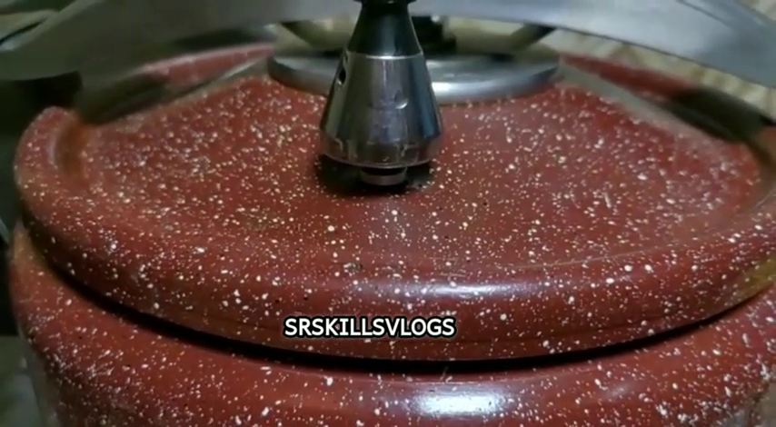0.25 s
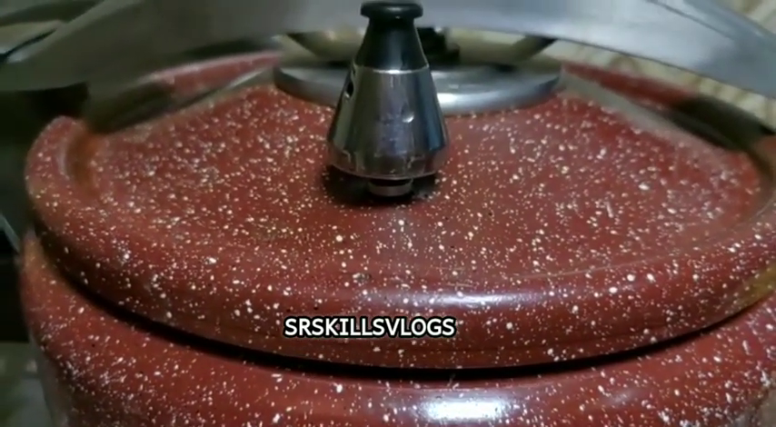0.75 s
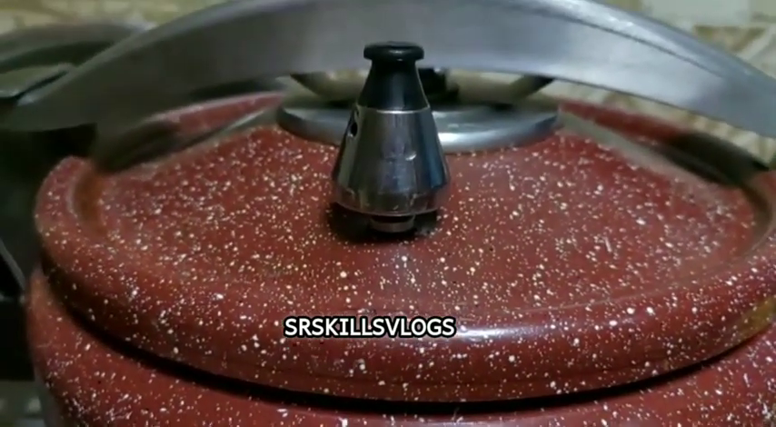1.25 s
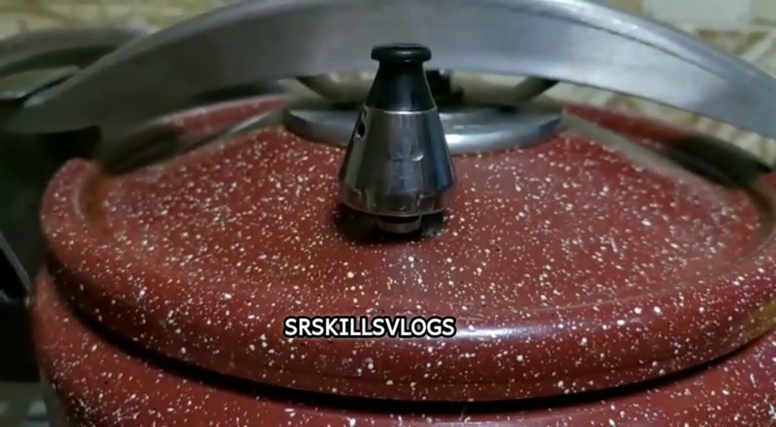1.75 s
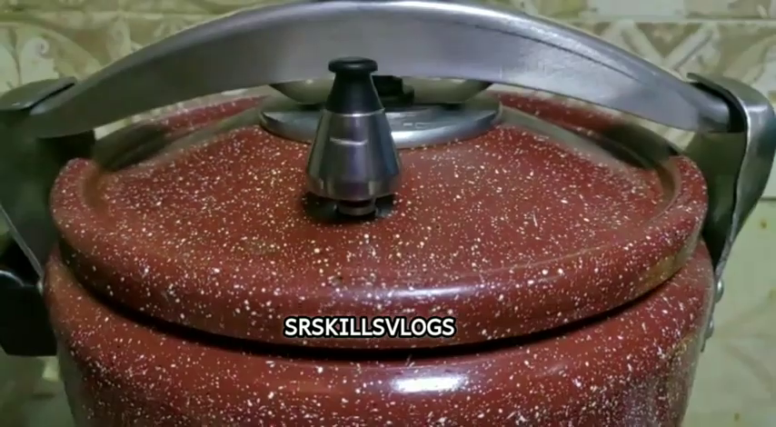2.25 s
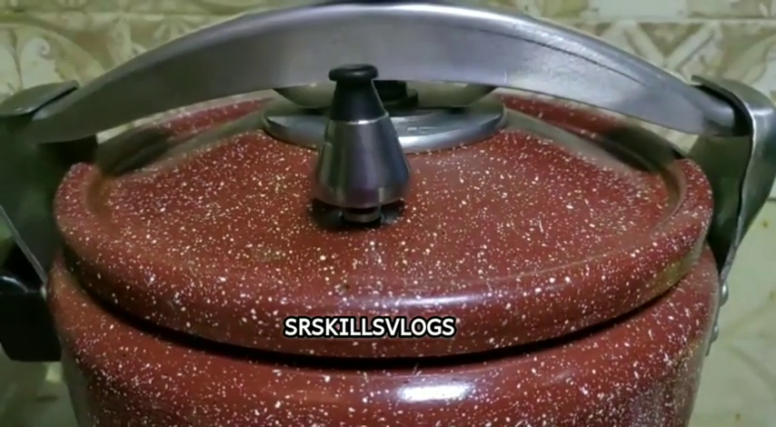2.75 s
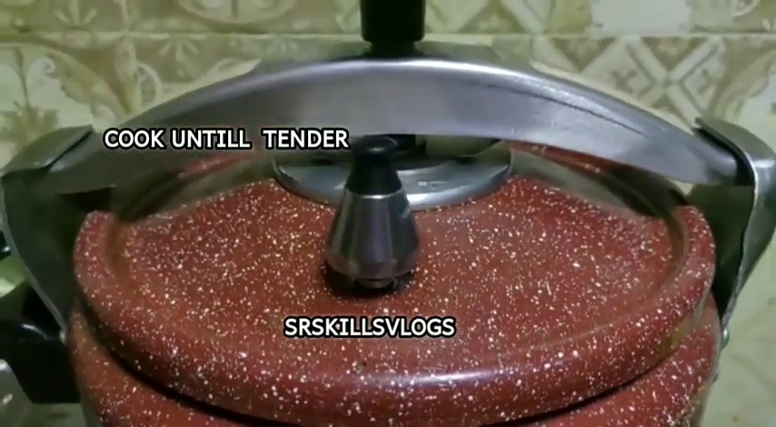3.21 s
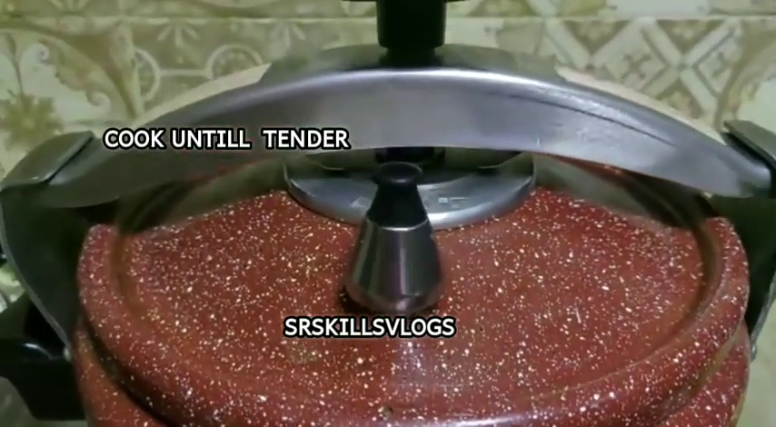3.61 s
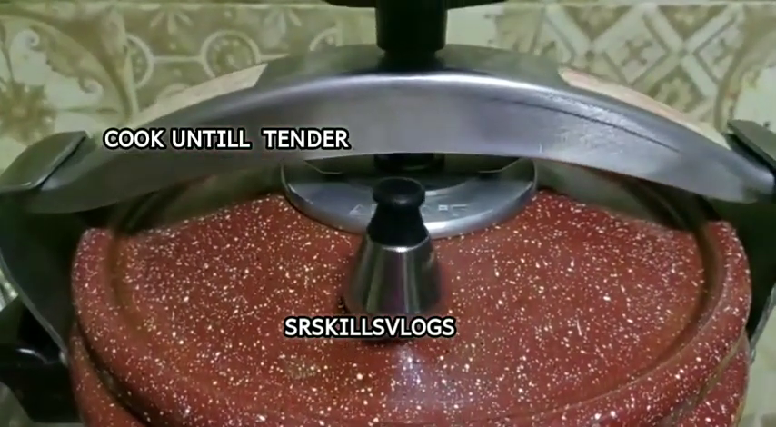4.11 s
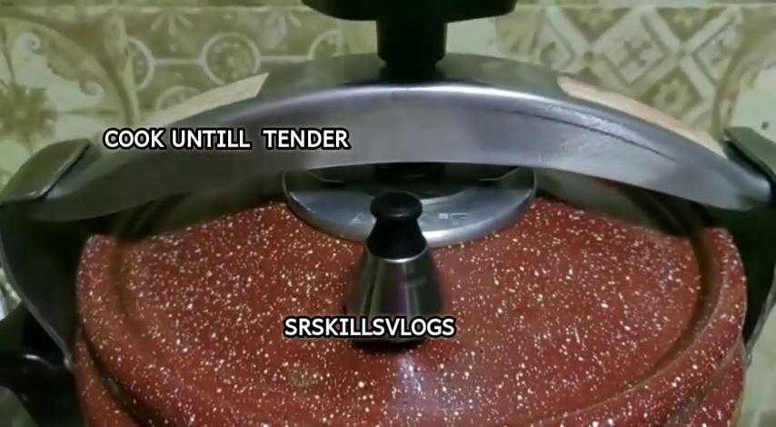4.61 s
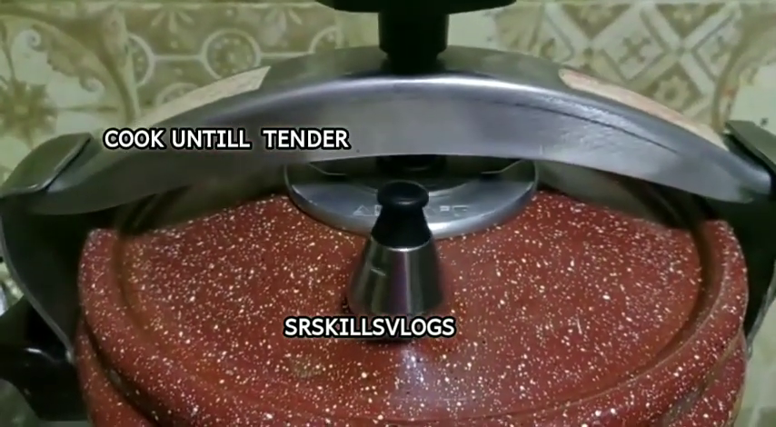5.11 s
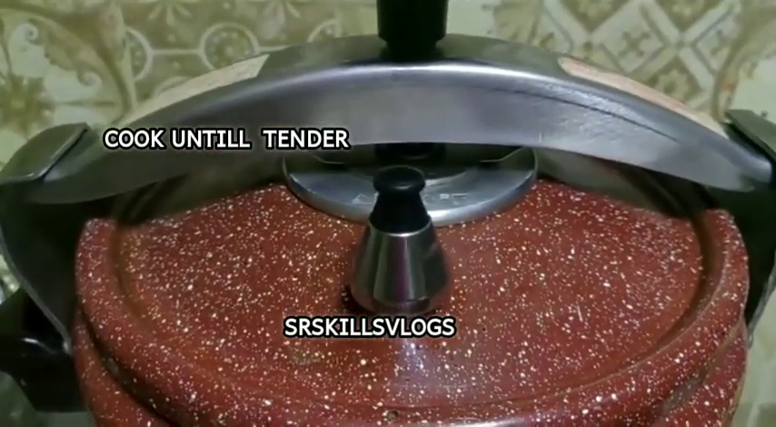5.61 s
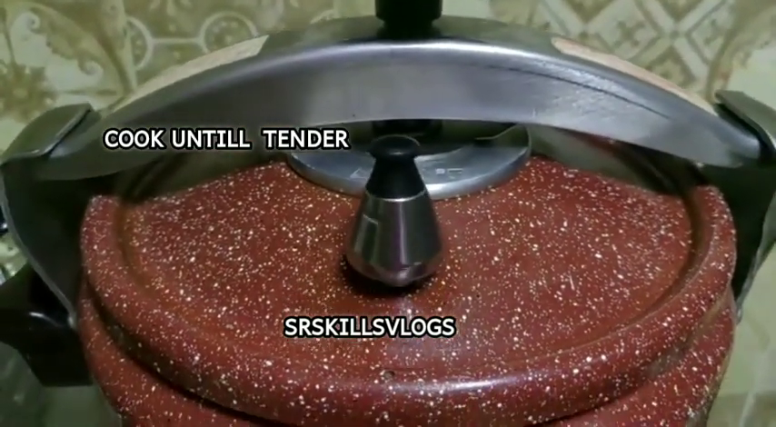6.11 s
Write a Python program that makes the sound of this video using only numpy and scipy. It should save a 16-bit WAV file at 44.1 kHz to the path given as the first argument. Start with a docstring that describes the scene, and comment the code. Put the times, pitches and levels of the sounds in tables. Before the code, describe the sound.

In a small tiled kitchen, a bird gives quick, bright, gliding chirps with short hard echoes over a faint room rush. Just after two seconds a pressure cooker valve starts hissing steadily, with one dull knock on the microphone. The bird calls on over the steam, then falls silent; the hiss flutters on, with coarse wet spits and faint distant hoots near the end.

```python
"""A small bird chirps and whistles close by: gliding tones, each answered by hard tiled walls.
A few faint hoots, wavering tones blurred by echo, then sound far off now and again over a faint room rush.
Steam hisses out from under a pressure cooker's weight valve: jet noise and gap resonances, rocked and surging.
Just after it starts, one dull knock bumps the microphone; water spits in coarse bursts, mostly near the end.
The bird falls silent before the end, while the hiss, the spitting and the hoots go on."""
import sys
import numpy as np
from scipy import signal
from scipy.fft import rfft, irfft, next_fast_len
from scipy.io import wavfile
from scipy.ndimage import uniform_filter1d, minimum_filter1d, map_coordinates

SR = 44100
rng = np.random.default_rng(int(sys.argv[2]) if len(sys.argv) > 2 else 0)


def master(y):
    """Save y as 16-bit WAV."""
    cut = np.clip(np.atleast_2d(y).T, -1, 1)
    pcm = np.round(cut * 32767)  # scale
    wavfile.write(sys.argv[1], SR, pcm.astype(np.int16))


N = 280476


def amp(db):
    """Decibels to gain."""
    return 10 ** (np.asarray(db) / 20)


def unit(x):
    """Scaled to rms 1."""
    return x / np.sqrt(np.mean(x ** 2) + 1e-20)


def colour(points):
    """EQ curve: gain over frequency from (f/Hz, level/dB) points on a log axis."""
    f, db = np.transpose(points)
    return lambda hz: amp(np.interp(np.log(hz + 1), np.log(f + 1), db))


def automation(rows):
    """Straight-line automation: one value per sample for each column after t/s."""
    s, *columns = np.transpose(rows)
    return [np.interp(np.arange(N) / SR, s, column) for column in columns]


def swells(rows):
    """A dB curve of smooth bumps from (middle t/s, length t/s, level/dB) rows."""
    t = np.arange(N) / SR
    return sum(db * np.cos(np.pi * np.clip((t - s) / length, -.5, .5)) ** 2 for s, length, db in rows)


def wobble(rate):
    """A smooth random curve, rate knots a second."""
    knots = rng.standard_normal(int(N * rate / SR) + 4)
    return map_coordinates(knots, [np.arange(N) * rate / SR])


def filtered(x, response):
    """x times a complex response of frequency."""
    m = next_fast_len(N + SR // 2)
    spectrum = rfft(x, m) * response(np.fft.rfftfreq(m, 1 / SR))
    return irfft(spectrum, m)[..., :N]


def add(track, s, x):
    """Mix x into the track from time s."""
    start = round(s * SR)
    track[start:start + len(x)] += x[:max(N - start, 0)]


def walls(x, early_db, early_t60, late_db, late_t60, reflections=900):
    """Direct sound, sparse quick wall reflections (so many a second) and a dense longer tail, at x's energy."""
    t = np.arange(SR // 2) / SR
    decay = amp(-60 * t / np.array([[early_t60], [late_t60]]))
    early, late = rng.standard_normal((2, len(t))) * (t > .003) * decay
    early = early * (rng.random(len(t)) < reflections / SR)
    echo = amp(early_db) * early / np.linalg.norm(early) + amp(late_db) * late / np.linalg.norm(late)
    wet = signal.fftconvolve(x, echo + (t == 0))
    return wet * np.linalg.norm(x) / np.linalg.norm(wet)


# the room's level: t/s, level/dB
ROOM_LEVEL = [(0, -58.5), (.4, -54), (2.18, -48), (2.23, -54.5), (3.4, -59), (4.6, -55), (5.4, -59),
              (6.36, -82)]
# the room's noise colour: f/Hz, relative level/dB (per Hz)
ROOM_COLOUR = [(25, 3.5), (60, -3.5), (100, -12), (200, -6.5), (370, -10), (500, -16), (950, -12.5),
               (2200, -19), (2650, -18), (3500, -25.5), (5200, -27), (7400, -26), (8300, -15.5),
               (9300, -52)]


def kitchen():
    """The faint rush of the kitchen: coloured noise whose level rises, drops and finally sinks."""
    room_db, = automation(ROOM_LEVEL)
    rush = unit(filtered(rng.standard_normal(N), colour(ROOM_COLOUR)))
    return amp(room_db + 0.91 * wobble(6)) * rush


# far hoots: start t/s, length t/s, first f/Hz, last f/Hz, level/dB
HOOTS = [(2.04, .13, 740, 765, -54), (2.36, .07, 755, 720, -40), (5.11, .1, 650, 615, -42),
         (5.52, .22, 955, 960, -42), (5.81, .16, 980, 915, -40), (6.09, .32, 600, 760, -37),
         (6.2, .18, 1150, 1160, -47)]


def hoots():
    """Soft, wavering tones that have come a long way, blurred by echo."""
    out = np.zeros(N)
    for s, length, first_hz, last_hz, db in HOOTS:
        size = int(length * SR)
        hz = np.linspace(first_hz, last_hz, size) * (1 + .02 * wobble(130)[:size])
        swell = amp(db) * np.sqrt(2) * signal.windows.tukey(size, .5)
        tone = swell * np.sin(2 * np.pi * np.cumsum(hz) / SR)
        add(out, s, walls(tone, early_db=-7, early_t60=.12, late_db=-10, late_t60=.3))
    return out


def knock(s=2.5711, thump_hz=76, thump_db=-10, t60=0.038, tap_db=-10, tap_time=0.00032, lean_db=2):
    """A bump on the microphone's body: a sharp push and a heavily damped low swing, louder at the left."""
    out, t = np.zeros(N), np.arange(SR // 8) / SR
    onset = 1 - np.exp(-t / tap_time)
    swing = amp(thump_db - 60 * t / t60) * np.cos(2 * np.pi * thump_hz * t + 1.2) * onset
    tap = amp(tap_db) * t / tap_time * np.exp(1 - t / tap_time)
    add(out, s, swing + tap)
    return out * amp([[lean_db], [-lean_db]])


def patches(x, patchy_db):
    """Patches of the noise some hundred Hz wide and tens of ms long swell and fade."""
    z = signal.stft(x, nperseg=512)[2]
    field = uniform_filter1d(rng.standard_normal(z.shape[1:]), size=4, axis=0)  # across frequency
    field = uniform_filter1d(field, size=9, axis=1)  # across time
    return signal.istft(z * amp(patchy_db * unit(field)), nperseg=512)[1][:, :N]


# share of the power that comes straight from the valve: f/Hz, share (0 to 1)
DIRECT_SHARE = [(500, 0.17), (2700, 0.67), (5500, 0.37), (7500, 0.18), (9000, 0.038)]
# the valve's pan: f/Hz, left minus right level/dB
SIDE_LEAN = [(500, 5), (2500, -3), (4500, 1.5), (7000, 1.5), (12000, -.6)]


def from_valve(response, lag_ms=0.14, patchy_db=3.0, alike=0.4):
    """Stereo noise of rms 1: the direct part reaches the left port first, the rest is diffuse."""
    share = lambda hz: np.clip(np.interp(hz, *np.transpose(DIRECT_SHARE)), 0, 1)
    sides = np.array([[.5], [-.5]])
    lead = lambda hz: np.exp(2j * np.pi * hz * lag_ms / 1000 * sides)
    direct = filtered(rng.standard_normal(N), lambda hz: np.sqrt(share(hz)) * lead(hz))
    common = np.clip(alike, 0, 1)
    diffuse = np.sqrt(common) * rng.standard_normal(N) + np.sqrt(1 - common) * rng.standard_normal((2, N))
    pair = direct + filtered(diffuse, lambda hz: np.sqrt(1 - share(hz)))
    return unit(filtered(patches(pair, patchy_db), lambda hz: response(hz) * colour(SIDE_LEAN)(hz) ** sides))


# wet spurts: t/s, level/dB, t60 t/s
SPURTS = [(2.449, -27, 0.18), (4.382, -34, 0.064), (5.571, -20.5, 0.17), (5.638, -23, 0.19),
          (5.763, -15.5, .2), (5.787, -25, 0.07), (5.936, -17.5, 0.22), (6.23, -23, 0.13)]
# the spurts' noise colour: f/Hz, relative level/dB (per Hz)
SPRAY_COLOUR = [(300, -51), (1500, -12), (2500, 9), (4500, 3), (8000, -1), (15000, -32)]


def spits(rise=0.0028, rough_db=1.5):
    """Drops of water blown through the gap burst into short, coarse spurts."""
    burst, t = np.zeros(N), np.arange(SR // 4) / SR
    for s, db, t60 in SPURTS:
        add(burst, s, amp(db - 60 * t / t60) * (1 - np.exp(-t / rise)))
    return burst * amp(rough_db * wobble(500)) * from_valve(colour(SPRAY_COLOUR))


STEAM_ON = 2.37  # s
PINCH_DB = 3  # typical dip of the jet at each rock of the weight
# steam pressure: t/s, level/dB
PRESSURE = [(2.39, -25.5), (2.7, -24.5), (3.6, -25.5), (4.4, -24.5), (5.2, -25.5), (5.9, -27.5),
            (6.36, -25.5)]
# rocking of the weight: t/s, f/Hz (rocks a second)
ROCKING = [(2.37, 14.2), (2.8, 14.24), (3.1, 10.95), (3.5, 12.8), (3.95, 18.8), (4.4, 13.6), (4.8, 14.12),
           (5.15, 13.53), (5.5, 9.5), (5.9, 10.86), (6.36, 6.5)]
# the weight lifts (+) or sinks onto its seat (-): middle t/s, length t/s, change of level/dB
SURGES = [(2.44, 0.12, 5), (2.59, 0.13, -4.5), (2.795, 0.12, 4.5), (4.385, 0.046, 5), (4.52, 0.098, -5),
          (4.645, 0.054, -4.5), (5.73, 0.066, -4.5), (6.2, 0.059, -3), (6.27, 0.039, -6)]


def flow():
    """Steam level (dB): a slowly varying pressure, surges, and a slightly uneven pinch at each rock."""
    pressure_db, = automation(PRESSURE)
    rate, = automation(ROCKING)
    steaming = np.arange(N) / SR > STEAM_ON
    turns = np.cumsum(rate * steaming) / SR + .06 * wobble(12)
    pinch = np.cos(np.pi * turns) ** 4 * (1 + .3 * wobble(10))
    return pressure_db + swells(SURGES) - PINCH_DB * pinch


# resonances of the gap under the weight: f/Hz, width f/Hz
GAP = [(5650, 730), (6850, 630), (8250, 790)]
# trim of each gap resonance, in the same order: level/dB
GAP_TRIM = [0, -6.5, -1]
# ride of the lowest resonance: t/s, level/dB
LOW_RING = [(2.4, -16), (3.05, -18), (3.3, -3), (4.2, 2.5), (6.36, -1.5)]
# a resonance flares up towards a whistle: middle t/s, length t/s, gain level/dB, resonance f/Hz
FLARES = [(2.69, 0.11, 12.5, 6850), (2.984, 0.25, 15.5, 6850), (3.327, 0.35, 12.5, 6850),
          (3.988, .2, 5.5, 5650), (4.82, 0.068, 9.5, 5650)]


def ringing():
    """Relative level (dB) of each gap resonance as it flares; the lowest one also builds up."""
    build_db, = automation(LOW_RING)
    levels = []
    for (centre, width), db in zip(GAP, GAP_TRIM):
        own_flares = [row[:3] for row in FLARES if abs(row[3] - centre) < width]
        levels.append(db + swells(own_flares))
    return [levels[0] + build_db] + levels[1:]


# the jet's noise colour: f/Hz, relative level/dB (per Hz)
JET_COLOUR = [(60, -21), (300, -20), (500, -15.5), (900, -9.5), (1500, -14.5), (2000, -8), (2700, 0.5),
              (3700, -2), (5000, -1.5), (8000, 1), (9700, -8.5), (11500, -3.5), (15000, -7.5)]


def steam(jet_db=2.5, gap_db=-4, flutter_db=1.18, sputter_db=0.98, opening=0.0085):
    """A turbulent jet and the resonances of its gap, all fluttering as the weight rocks on its seat."""
    flow_db = flow()
    opened = np.clip((np.arange(N) / SR - STEAM_ON) / opening, 0, 1)
    drift_db = .7 * wobble(22)
    hiss = amp(jet_db + drift_db) * from_valve(colour(JET_COLOUR))
    for (centre, width), edge_db in zip(GAP, ringing()):
        ring = from_valve(lambda hz: 1 / (1 + ((hz - centre) / width) ** 2) ** 2)
        hiss = hiss + amp(gap_db + edge_db + 1.03 * wobble(14)) * ring
    return opened * amp(flow_db + flutter_db * wobble(45) + sputter_db * wobble(190)) * hiss


def glide(length, attack, release, depth_db, pitches):
    """Pitch (Hz) and level (dB) of a note: one smooth bend under attack, hold and release."""
    t = np.arange(int(length * SR)) / SR
    bend = np.polyfit(np.linspace(0, 1, len(pitches)), pitches, len(pitches) - 1)
    fade = np.maximum(1 - t / attack, 0) ** 2 + np.maximum(1 - (length - t) / release, 0) ** 2
    return np.polyval(bend, t / length), -depth_db * fade


# kinds of note: length t/s, attack t/s, release t/s, depth of both fades level/dB,
# [pitch f/Hz at even steps through the note]
WHISTLE = (0.13, 0.062, 0.076, 37, [2550, 2560, 2530, 2540])
PIP = (.028, 0.014, 0.028, 26, [2470, 2530, 2860])
FLICK = (0.033, 0.0081, .02, 33, [3660, 2080, 1630])
TEW = (0.064, .033, .027, 45, [3420, 3240, 2654, 2420, 2460])
CHIP = (.041, 0.026, 0.0063, 23, [1210, 1798, 2504, 2236, 1340])
RISE = (0.067, 0.028, 0.032, 20, [2100, 3500, 3620])
FALL = (.075, 0.028, 0.031, 25, [3090, 2400, 1720])
SEEP = (.088, 0.02, 0.027, 20, [3760, 3340, 3240])
TICK = (0.02, 0.002, 0.017, 16, [1400, 1900, 1470])
PEEP = (0.03, 0.011, 0.026, 17, [2780, 3040, 3640])
SLIDE = (0.16, .02, .04, 12, [2100, 2660, 3000])
WARBLE = (.038, 0.015, 0.0086, 15, [1757, 1620, 1874, 1768, 1436])
LIFT = (.049, 0.025, .025, 21.7, [1540, 1930, 2452, 2440, 2800])
# single notes: t/s, level/dB, kind of note
CALL = [(.522, -21, WHISTLE), (.645, -52, SLIDE), (.769, -11, PIP), (.801, -8, FLICK), (1.114, -5.5, TEW),
        (1.458, -6, TEW), (1.786, -12, CHIP), (1.871, -10, CHIP), (1.959, -10.5, CHIP),
        (2.073, -17.5, RISE), (2.42, -29, WHISTLE), (2.49, -38, SLIDE), (2.578, -22.5, PEEP),
        (2.739, -28, TICK), (2.772, -24.5, TICK), (2.925, -4.5, FALL), (3.066, -23.5, PEEP),
        (4.02, -15.5, SEEP)]
# a run of two-note calls, each a low warble and then a lift: t/s, level/dB of the lift
RUN = [(3.365, -8), (3.522, -7), (3.675, -7), (3.832, -6.5)]
LIFT_AFTER_S, WARBLE_DB = 0.048, -6  # from warble to lift; the warble against the lift


def notes():
    """All notes as (t/s, level/dB, kind), the run spelled out."""
    warbles = [(s, db + WARBLE_DB, WARBLE) for s, db in RUN]
    lifts = [(s + LIFT_AFTER_S, db, LIFT) for s, db in RUN]
    return CALL + warbles + lifts


# colour of the noisy splatter on loud notes: f/Hz, relative level/dB (per Hz)
SPLATTER_COLOUR = [(25, 9.5), (45, 0.5), (80, -11), (150, -20), (600, -16), (1500, 5), (3000, 2),
                   (5000, -10), (6500, -14), (8500, -8), (9400, -69.5)]


def bird(second_db=-52, third_db=-32, splatter_db=-21, jitter=0.0097, third_hz=7100, third_width_hz=800):
    """Gliding tones; loud ones get more broadband splatter and a third harmonic, strongest near 7 kHz."""
    song, loudness = np.zeros(N), np.zeros(N)
    for s, db, kind in notes():
        hz, level_db = glide(*kind)
        size = len(hz)
        phase = 2 * np.pi * np.cumsum(hz * (1 + jitter * wobble(401)[:size])) / SR
        loud = amp(db + level_db) * signal.windows.tukey(size, .08)
        emphasis = 1 / (1 + ((3 * hz - third_hz) / third_width_hz) ** 4)
        third = np.sqrt(loud) * emphasis * np.sin(3 * phase)
        overtones = amp(second_db) * np.sin(2 * phase) + amp(third_db) * third
        tone = np.sin(phase) + overtones * (1 + wobble(900)[:size])  # the overtones are hoarse
        voice = np.sqrt(2) * loud * tone
        add(song, s, walls(voice, early_db=-1.0, early_t60=0.11, late_db=-24.0, late_t60=0.76))
        add(loudness, s + 0.0072, loud * np.sqrt(loud))  # the splatter comes a little late
    grain_db = 3 * wobble(300)
    splatter = unit(filtered(rng.standard_normal(N), colour(SPLATTER_COLOUR)))
    return song + amp(splatter_db + grain_db) * loudness * splatter


def scene():
    """Bird, hoots and room in the middle, the cooker a little to the left."""
    return kitchen() + hoots() + knock() + spits() + steam() + bird()


TOP_HZ = 15300  # upper end of the band


def record(dry, ceiling=1.0):
    """A fast limiter holds any peaks over the ceiling, then a steep low-pass ends the band."""
    needed = np.minimum(1, ceiling / (np.abs(dry).max(axis=0) + 1e-9))
    gain = uniform_filter1d(minimum_filter1d(needed, size=130), size=130)
    return filtered(dry * gain, lambda hz: 1 / (1 + (hz / TOP_HZ) ** 240))


dry = scene()
out = record(dry)
master(out)
```